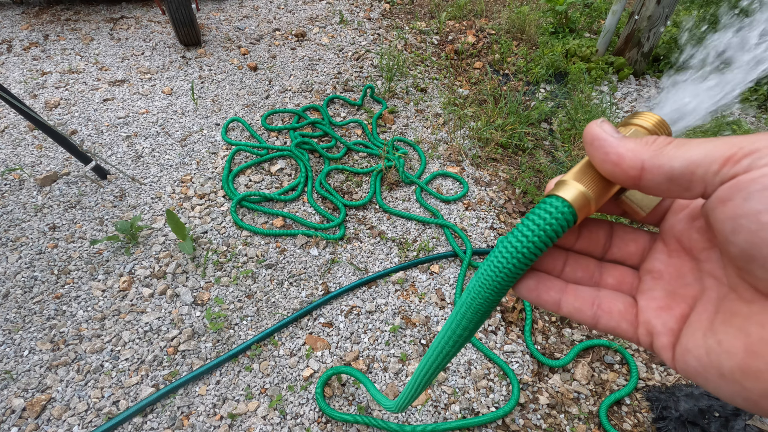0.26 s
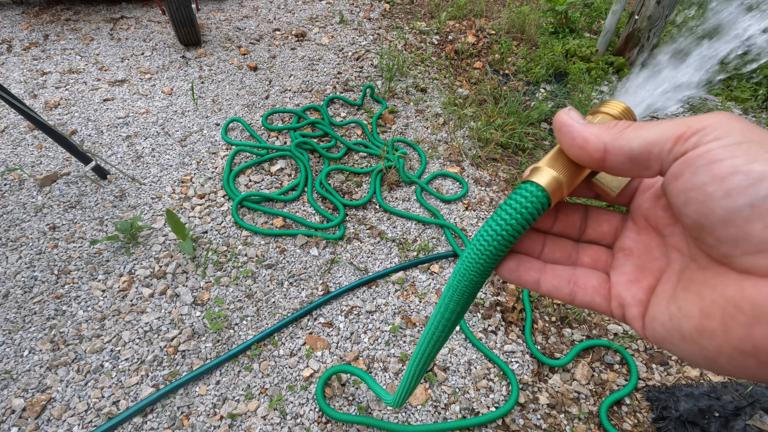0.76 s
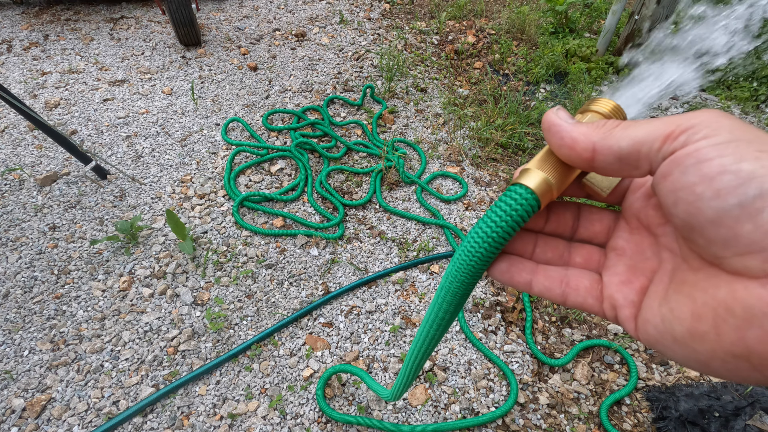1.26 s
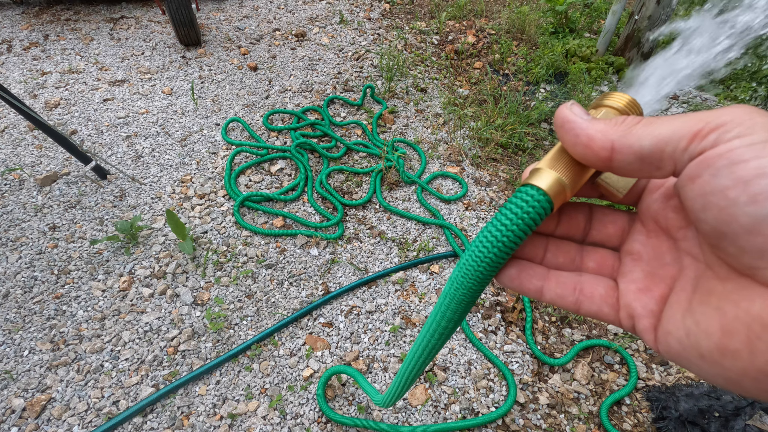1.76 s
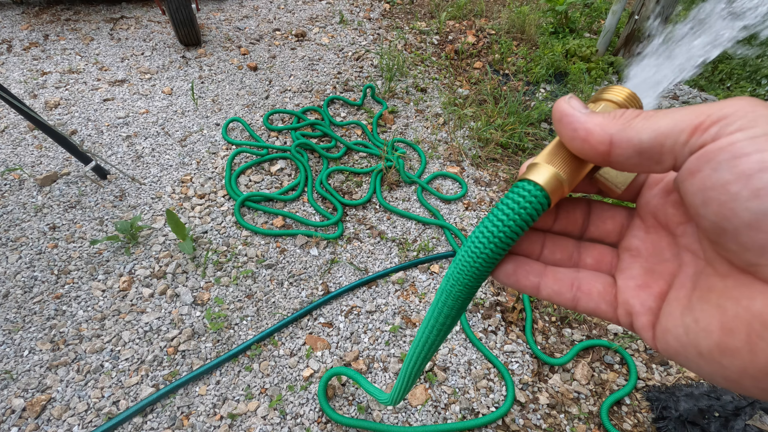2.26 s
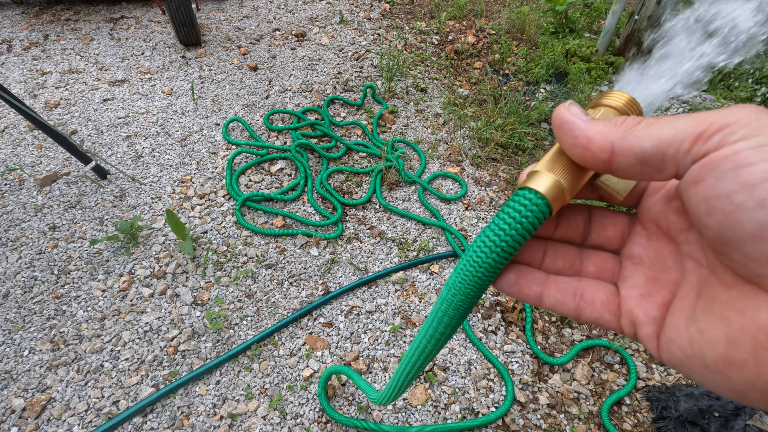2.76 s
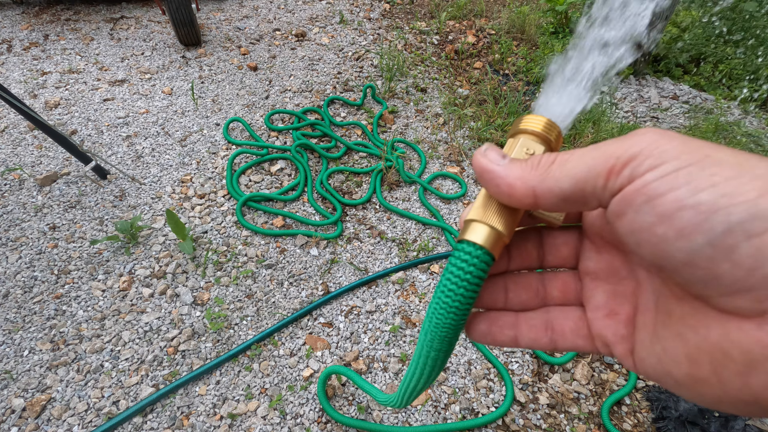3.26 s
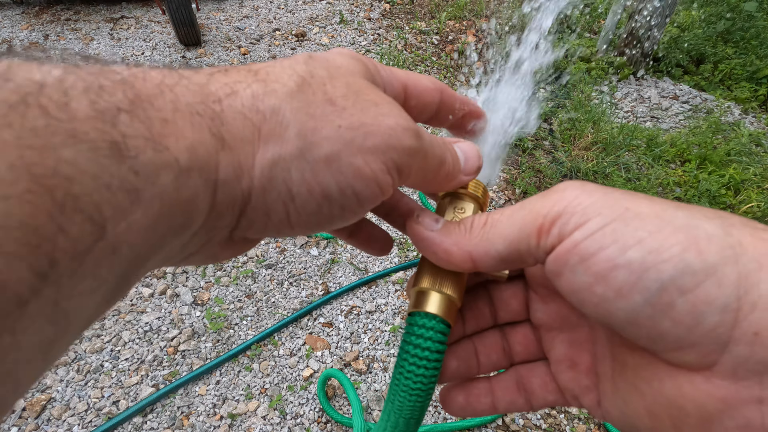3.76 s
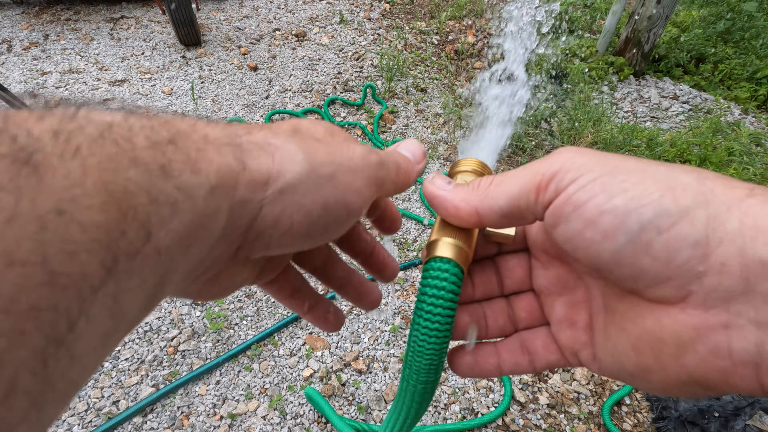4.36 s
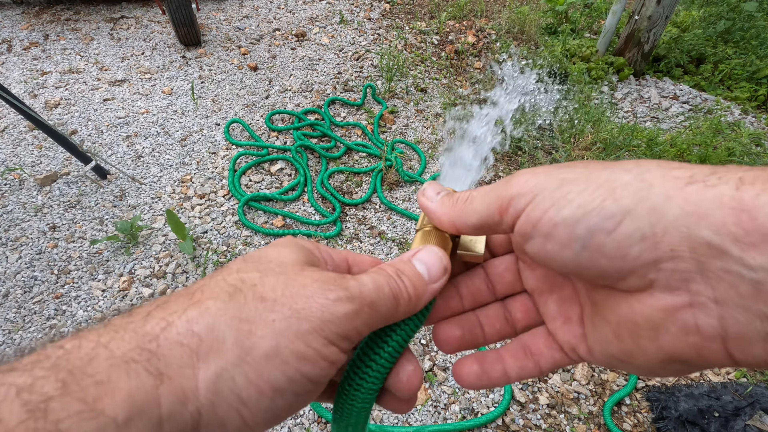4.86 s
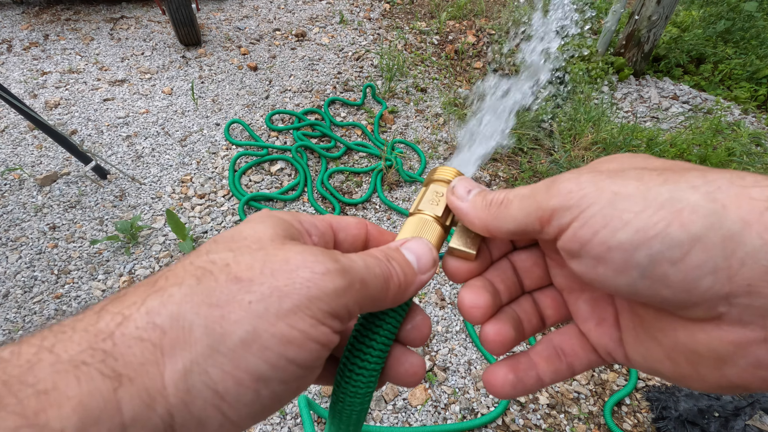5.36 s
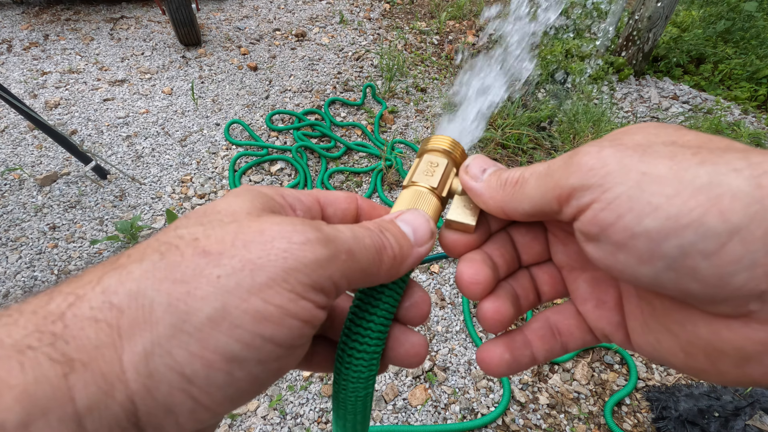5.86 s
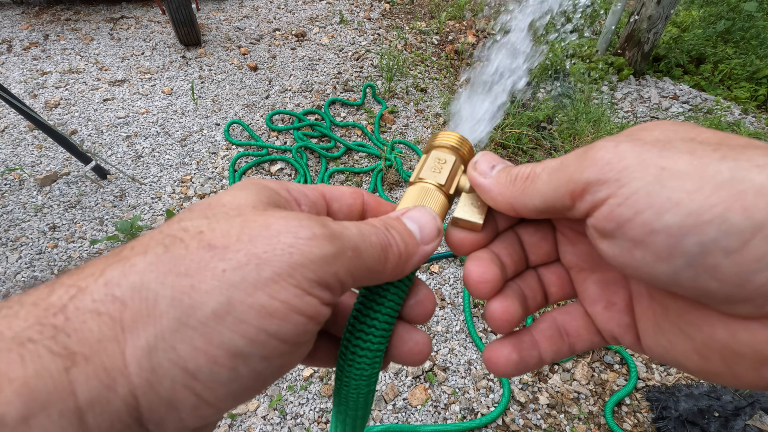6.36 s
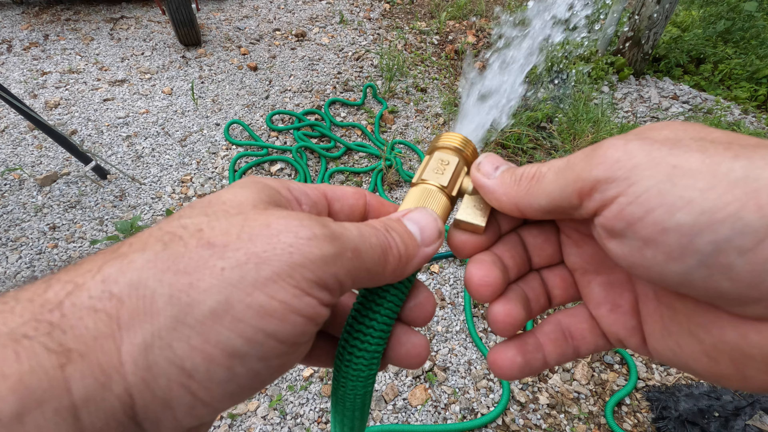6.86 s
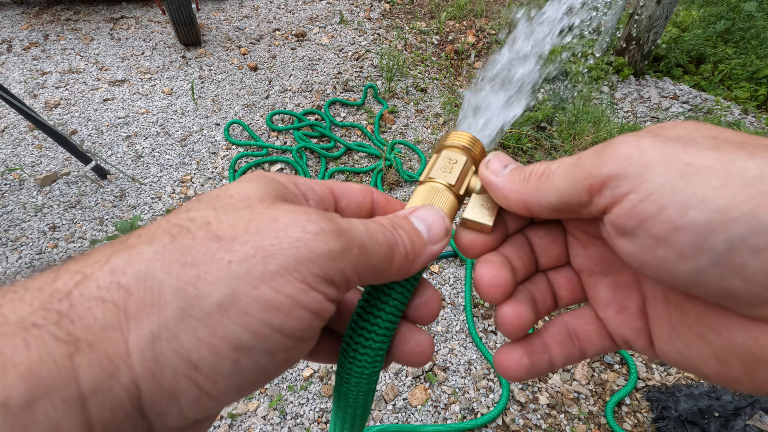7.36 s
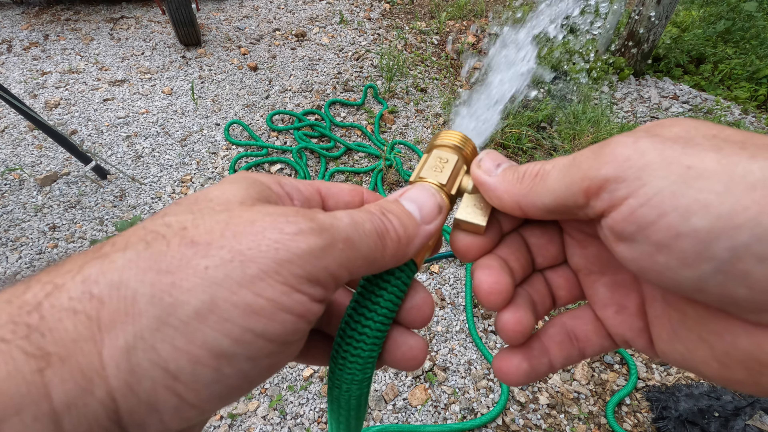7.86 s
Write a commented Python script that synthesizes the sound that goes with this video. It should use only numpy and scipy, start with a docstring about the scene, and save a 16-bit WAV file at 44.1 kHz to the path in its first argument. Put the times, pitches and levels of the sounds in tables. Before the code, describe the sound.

A garden hose gushes with a crackling, spitting hiss outdoors, swelling briefly into finer spray midway, with faint splatter on stones.

```python
"""Hose valve spraying onto gravel.

Water tears out of a close brass valve: a dense crackling hiss, with single spits as air pockets burst.
A hand turns the mouth towards the listener, trading its narrow ring for a broad hump higher up.
A fingertip dips into the jet and fans it into spray. The water splatters on gravel further off.
A low outdoor rumble and a faint mains hum lie underneath."""
import sys
import numpy as np
from scipy import signal
from scipy.fft import rfft, irfft, next_fast_len
from scipy.io import wavfile
from scipy.ndimage import uniform_filter1d, map_coordinates

SR = 44100
rng = np.random.default_rng(int(sys.argv[2]) if len(sys.argv) > 2 else 0)


def digitize_waveform(pressure):
    """Quantize a signal to 16-bit integers and store it at the path in sys.argv[1].

    Rows of a 2-D input are taken as channels; values are limited to [-1, 1].
    """
    field = np.atleast_2d(pressure).T
    bounded = np.clip(field, -1, 1)
    quanta = np.round(bounded * 32767).astype(np.int16)
    wavfile.write(sys.argv[1], SR, quanta)


N = 358533


def amp(db):
    """Gain of a level in dB."""
    return 10 ** (np.asarray(db) / 20)


def unit(x):
    """x at rms 1."""
    return x / np.sqrt(np.mean(x ** 2) + 1e-20)


def along(rows, hz, column=1):
    """One column of (Hz, value, ..) rows, read on a log axis."""
    columns = np.transpose(rows)
    return np.interp(np.log(hz + 1), np.log(columns[0] + 1), columns[column])


def curve(rows):
    """(seconds, value) rows as one value per sample."""
    return np.interp(np.arange(N) / SR, *np.transpose(rows))


def wobble(rate_hz):
    """Smooth random curve, rate_hz knots a second."""
    knots = rng.standard_normal(int(N * rate_hz / SR) + 4)
    return map_coordinates(knots, [np.arange(N) * rate_hz / SR])


def filtered(x, response):
    """x through a response given as a function of Hz."""
    size = next_fast_len(N + 8192)
    return irfft(rfft(x, size) * response(np.fft.rfftfreq(size, 1 / SR)), size)[..., :N]


def bursts(events, rise_s, fall_s):
    """Envelope of short (seconds, dB) events."""
    t = np.arange(-400, 2000) / SR
    shape = np.where(t < 0, np.exp(t / rise_s), np.exp(-t / fall_s))
    start_s, db = np.transpose(events)
    peaks = np.bincount(np.round((start_s + rise_s) * SR).astype(int), amp(db), N)[:N]
    return signal.fftconvolve(peaks, shape)[400:N + 400]


def patches(pair, depth_db, size, bins, frames):
    """Random gain in spectrogram patches of bins x frames."""
    cells = signal.stft(pair, nperseg=size)[2]
    field = uniform_filter1d(rng.standard_normal(cells.shape[1:]), bins, axis=0)
    field = uniform_filter1d(field, frames, axis=1)
    return signal.istft(cells * amp(depth_db * unit(field)), nperseg=size)[1][:, :N]


# Stereo likeness. Each row: frequency in Hz, left-right correlation.
CORRELATION = [(30, 0.71), (100, 0.78), (200, 1), (500, 0.83), (1000, 0.97), (6000, 0.89), (11000, 0.81),
               (11900, 0.18), (12700, 0.64), (15000, .5)]
FLAT = [(1000, 0)]


def heard(pair, spectrum, ports):
    """Colours a signal pair and mixes it to left and right as two microphone ports hear it, rms 1."""
    def colour(hz):
        angle = np.arccos(np.clip(along(CORRELATION, hz), -1, 1)) / 2
        return amp(along(spectrum, hz)) * [np.cos(angle), np.sin(angle)]

    def port_offset(hz):
        half = np.array([[.5], [-.5]])
        return amp(half * along(ports, hz, column=2)) * np.exp(-1j * half * along(ports, hz))

    mid, side = filtered(pair, colour)
    return unit(filtered(np.array([mid + side, mid - side]), port_offset))


def droplets(count, cycles, spread_db, linger):
    """Tiny bubbles: damped sines at scattered pitches, mostly faint and short, a few strong or long."""
    start, pitch, chance, luck = rng.random((count, 4)).T[:, :, None]
    hz = 700 * 2 ** (4.444 * pitch)
    strength = amp(-spread_db * np.log(chance + .018))
    life_cycles = cycles * (1 + linger * luck ** 4)
    gain = strength * np.sqrt(cycles / life_cycles) * hz  # times hz: even energy per Hz
    t = np.arange(160) / SR
    pops = gain * np.sin(2 * np.pi * hz * t) * np.exp(-t * hz / life_cycles)
    at = (start * N).astype(int) + np.arange(160)
    return unit(np.bincount(at.ravel(), pops.ravel(), N + 160)[:N])


def turbulence(patchy_db, grainy_db, flutter_db, crackle_db, drops_db):
    """Breaking water: two patchy white noises swelling together, with droplets in the first."""
    pair = patches(rng.standard_normal((2, N)), patchy_db, size=256, bins=5, frames=3)
    pair = patches(pair, grainy_db, size=64, bins=3, frames=2)
    pair = unit(pair * amp(crackle_db * wobble(700)))
    pair[0] += amp(drops_db) * droplets(count=12000, cycles=1.3, spread_db=3.5, linger=4.6)
    return pair * amp(flutter_db * wobble(40))


# Jet spectra from the side and the front. Each row: frequency in Hz, relative density in dB.
ASIDE_SPECTRUM = [(710, -47), (1200, -14), (1410, -16.5), (2050, -8.5), (2330, -12), (2620, -6), (2920, -8),
                  (3500, -5.5), (3740, -2.5), (4090, -2.5), (4340, -5), (4750, -5.5), (5300, -8.5),
                  (5990, -8), (6810, -13.5), (8520, -13.5), (10000, -22.5), (12300, -24.5), (15500, -48)]
FACING_SPECTRUM = [(710, -26), (1200, -16), (1650, -13), (2010, -15), (2680, -11), (2950, -6.5),
                   (3320, -10.5), (3750, -5.5), (4340, -1.5), (4750, 0), (4950, -1.5), (5200, -1.5),
                   (5450, -6), (5700, -9), (6300, -10.5), (7300, -9), (7900, -9.5), (8350, -14),
                   (9490, -13.5), (10000, -17.5), (10700, -18), (11600, -23.5), (11900, -28), (12400, -25),
                   (13700, -30), (14500, -34), (15500, -46)]
# Jet at the ports. Each row: frequency in Hz, right lead in radians, left over right in dB.
ASIDE_PORTS = [(300, 0, -1.5), (1300, 0.57, -4), (3000, 0.75, -4.5), (4520, 0.54, -3.5), (5900, 0.55, -4.5),
               (8700, -0.76, -5.5), (10500, -0.0026, -.7), (11500, -.2, 0), (12100, -0.92, 3),
               (13000, -.1, -1)]
FACING_PORTS = [(300, -0.32, 1), (1300, 0.52, -3.5), (3000, 0.56, -3), (4700, 0.48, -1), (6500, 0.54, -1.5),
                (8700, 0.68, -3.5), (10500, -0.13, 0), (11700, .2, 0), (12200, -1.6, 2),
                (13000, -0.8, -0.5)]
# Aim of the mouth. Each row: time in seconds, turn from 0 (aside) to 1 (facing).
MOUTH_TURN = [(0, 0.12), (1.3, 0.028), (2.5, 0.08), (3.1, 0.12), (3.7, 0.42), (4.55, 0.57), (4.8, 0.67),
              (5.2, 0.84), (6, 0.94), (8.13, 0.91)]


def aimed(pair, aside=ASIDE_SPECTRUM, facing=FACING_SPECTRUM):
    """The turning mouth crossfades its side sound into its front sound."""
    turn = curve(MOUTH_TURN)
    return (1 - turn) * heard(pair, aside, ASIDE_PORTS) + turn * heard(pair, facing, FACING_PORTS)


# Jet strength. Each row: time in seconds, level in dB before aim and hand.
JET_LEVEL = [(0, -25.5), (2.5, -24.5), (3.0, -24.5), (3.39, -23.5), (3.425, -23.5), (3.46, -23),
             (3.64, -28.5), (3.68, -25), (3.73, -27.5), (3.85, -28.5), (4.4, -26), (4.55, -23.5),
             (4.95, -23.5), (5.15, -23.5), (6, -23), (6.3, -23.5), (6.44, -23), (6.5, -21.5), (6.56, -24.5),
             (6.6, -22.5), (6.68, -21), (6.72, -24.5), (6.85, -24.5), (6.93, -22.5), (7, -23.5),
             (7.18, -25), (7.33, -23.5), (7.4, -22), (7.47, -23.5), (7.6, -23), (7.7, -23), (7.78, -23.5),
             (7.9, -24), (8.13, -24)]


def jet():
    """The jet breaks up into a crackling hiss."""
    water = turbulence(patchy_db=0.67, grainy_db=1.84, flutter_db=0.35, crackle_db=1.4, drops_db=-6.5)
    return amp(curve(JET_LEVEL)) * aimed(water)


def mouth_ring(low_hz=3705, width_hz=170, wander_hz=90, aside_db=-33, facing_change_db=-22):
    """The flow rings the valve mouth in a narrow, wandering band that fades as it turns to the front."""
    def resonance(hz, centre_hz):
        damping = 1j * hz * width_hz
        return np.abs(damping / (centre_hz ** 2 - hz ** 2 + damping)) ** 2

    calm = turbulence(patchy_db=0, grainy_db=-2.5, flutter_db=1, crackle_db=-0.5, drops_db=-15)
    flow = heard(calm, FLAT, ASIDE_PORTS)
    low = filtered(flow, lambda hz: resonance(hz, low_hz))
    high = filtered(flow, lambda hz: resonance(hz, low_hz + wander_hz))
    high_share = 1 / (1 + np.exp(1 - 2 * wobble(4)))
    level_db = aside_db + facing_change_db * curve(MOUTH_TURN) + 1.3 * wobble(12)
    return amp(level_db) * unit((1 - high_share) * low + high_share * high)


# Loudest air pockets. Each row: start in seconds, relative level in dB, pitch in Hz.
AIR_POCKETS = [(0.1045, -10, 3760), (0.2633, -9, 4000), (0.2682, -10, 3510), (0.3255, -13, 3900),
               (0.3606, -9, 4050), (0.3895, -9, 5700), (0.609, -7, 3760), (0.991, -9, 3740),
               (1.0932, -8, 3730), (1.1457, -9, 3690), (1.701, -11, 4070), (1.725, -8.5, 3780),
               (1.9622, -10, 4130), (2.0928, -13, 4020), (2.1375, -17, 3770), (2.6893, -7, 3680),
               (2.932, -11, 3890), (3.289, -12, 5500), (3.3647, -10, 5030), (3.427, -8, 5000),
               (3.9703, -13, 3720), (4.0027, -5.5, 2990), (4.0412, -6, 3930), (4.1017, -5.5, 2970),
               (4.563, -7, 4360), (4.711, -5, 4270), (4.876, -13, 4460), (4.9935, -7, 4960),
               (5.0469, -3.5, 5000), (5.0806, -8, 4490), (5.1218, -13, 4620), (5.1452, -12, 4700),
               (5.1685, -9, 4660), (5.173, -9, 4303), (5.1835, -13, 7960), (5.3604, -7.5, 3970),
               (5.437, -7, 4500), (5.642, -10, 4390), (5.975, -7, 4070), (6.001, -7, 4570),
               (6.059, -11, 4700), (6.1604, -17, 4130), (6.476, -10, 4950), (6.7341, -11, 4700),
               (7.1212, -13, 4460), (7.3203, -11, 4900), (7.3931, -5, 4520), (7.5522, -9, 4290),
               (7.5793, -12, 5080), (7.754, -5, 4650), (7.7992, -7, 4580), (7.8092, -7, 4960),
               (7.94, -11, 4720), (7.9823, -11, 4740), (8.0031, -10, 4470), (8.015, -4.5, 5050),
               (8.0579, -8.5, 4600)]


def spits(small_count=18, hiss_db=-9.5, tone_db=-6, lag_s=0.00058, rise_s=0.0007, fall_s=0.001):
    """Air pockets burst at the mouth: loud ones hiss and ring, small random ones only hiss."""
    when, chance = rng.random((small_count, 2)).T
    small_db = -20.5 + 2 * (2 * chance - 1)
    small = bursts(np.transpose([when * N / SR, small_db]), rise_s, fall_s)
    start_s, loud_db, pitch_hz = np.transpose(AIR_POCKETS)
    loud = bursts(np.transpose([start_s + lag_s, loud_db]), rise_s, fall_s)
    nearest = np.searchsorted((start_s[1:] + start_s[:-1]) / 2, np.arange(N) / SR)
    phase = 2 * np.pi * (np.cumsum(pitch_hz[nearest]) / SR + rng.random())
    tone = amp(tone_db) * loud * np.sin(phase)
    hiss = (amp(hiss_db) * loud + small) * np.sign(rng.standard_normal((2, N)))
    return np.std(hiss) * aimed(hiss) + np.std(tone) * aimed(np.array([tone, 0 * tone]), FLAT, FLAT)


# Spray strength. Each row: time in seconds, level in dB before the hand.
SPRAY_LEVEL = [(3.3, -42), (3.55, -27), (3.75, -22), (3.84, -24), (3.9, -20.5), (3.97, -22), (4.0, -20),
               (4.025, -22.5), (4.05, -18), (4.08, -21), (4.13, -20), (4.18, -20), (4.24, -20),
               (4.31, -19.5), (4.37, -26), (4.42, -24), (4.5, -26.5), (4.62, -37), (4.8, -60)]
# Spray colour. Each row: frequency in Hz, relative density in dB.
SPRAY_SPECTRUM = [(350, -49), (600, -36), (716, -38), (1010, -15), (1230, -12.5), (1430, -7.5), (3070, 0.5),
                  (4380, -2), (5590, -8.5), (7350, -2.5), (8300, -8), (10800, -13), (13700, -24),
                  (15500, -41)]
# Spray at the ports. Each row: frequency in Hz, right lead in radians, left over right in dB.
SPRAY_PORTS = [(300, 0.1, 4), (2800, 0.53, -3), (4300, 0.74, .7), (5000, 1, 2), (6000, 0.21, -0.5),
               (9500, 0.47, 0), (11600, 0.41, 0), (12400, -1.3, 4.5), (13200, -.4, 0)]


def finger_spray():
    """The fingertip fans part of the jet into a finer, louder spray."""
    water = turbulence(patchy_db=1, grainy_db=1.5, flutter_db=0.5, crackle_db=1.7, drops_db=-3.5)
    return amp(curve(SPRAY_LEVEL)) * heard(water, SPRAY_SPECTRUM, SPRAY_PORTS)


# Bands the hand lifts or shades. Each row: start and end in seconds, first and last centre in Hz,
# width in Hz, gain in dB.
HAND_BANDS = [(3.2, 3.55, 5700, 5400, 450, 3.5), (3.46, 3.8, 4600, 4800, 350, 5),
              (3.25, 3.48, 4600, 4100, 250, -1.5), (3.86, 4.08, 3600, 3100, 400, 1.5),
              (3.1, 3.75, 6800, 5000, 420, -2), (3.7, 4.15, 4600, 5700, 300, -5.5),
              (3.2, 4.5, 9100, 8900, 520, -2.5), (3.95, 4.37, 11000, 9300, 1000, 2),
              (4.3, 4.52, 5700, 3100, 480, -4.5), (4.42, 4.74, 3550, 3000, 240, -8),
              (4.45, 4.78, 3800, 3680, 150, 4.5), (4.33, 4.5, 7700, 8400, 2900, -3),
              (4.41, 5.16, 6100, 9700, 2000, -3), (4.75, 5.3, 3900, 3300, 530, 1.5),
              (5.1, 6.7, 3950, 4100, 300, 1.5)]


def hand(valve, fade_share=0.26):
    """Reflection and shadow of the hand near the mouth: bell-shaped gains that come, glide and go."""
    hz, t, cells = signal.stft(valve, SR, nperseg=512)
    db = 0
    for start_s, end_s, from_hz, to_hz, width_hz, gain_db in HAND_BANDS:
        progress = (t - start_s) / (end_s - start_s)
        fade = np.clip(np.minimum(progress, 1 - progress) / fade_share, 0, 1)
        centre_hz = from_hz + progress * (to_hz - from_hz)
        db = db + gain_db * fade * np.exp(-.5 * ((hz[:, None] - centre_hz) / width_hz) ** 2)
    return signal.istft(cells * amp(db), SR, nperseg=512)[1][:, :N]


# Splatter on the gravel. Each row: time in seconds, level in dB.
GRAVEL_LEVEL = [(0, -39.5), (.8, -40.5), (1.3, -44.5), (1.7, -40.5), (3.5, -39.5), (3.65, -37), (4.3, -37),
                (4.75, -42), (5, -38), (6.27, -39), (6.36, -34.5), (6.68, -35), (6.74, -37.5),
                (8.13, -38.5)]
# Splatter colour. Each row: frequency in Hz, relative density in dB.
GRAVEL_SPECTRUM = [(250, -12), (450, -10.5), (750, -7.5), (950, -0.5), (1300, -4.5), (2000, -10),
                   (4000, -32), (9000, -46)]
# Big slugs of water. Each row: start in seconds, peak in dB.
BIG_SLUGS = [(5.509, -21), (6.6765, -16.5)]
# Far sources at the ports. Each row: frequency in Hz, right lead in radians, left over right in dB.
FAR_PORTS = [(30, 0, -0.5), (300, 0, -1.5), (1000, 0.27, -2.1), (3000, .5, 0)]


def gravel_splatter():
    """Water splatters on stones a few metres away; each big slug gives a single slap."""
    water = turbulence(patchy_db=1.9, grainy_db=2.3, flutter_db=1.15, crackle_db=1.6, drops_db=-16.5)
    splatter = amp(curve(GRAVEL_LEVEL)) * heard(water, GRAVEL_SPECTRUM, FAR_PORTS)
    push = bursts(BIG_SLUGS, rise_s=0.0001, fall_s=0.00015)
    slaps = heard(np.array([push, 0 * push]), GRAVEL_SPECTRUM, FAR_PORTS)
    return splatter + slaps * push.max() / np.abs(slaps).max()


# Rumble strength. Each row: time in seconds, level in dB.
RUMBLE_LEVEL = [(0, -44.5), (3.3, -45.5), (3.65, -42.5), (5, -45), (6.4, -43), (8.13, -44)]
# Rumble colour. Each row: frequency in Hz, relative density in dB.
RUMBLE_SPECTRUM = [(12, -36), (20, -13), (65, -12.5), (92, -15), (107, -21), (182, 0), (278, -6), (307, -8),
                   (543, -22.5), (600, -11.5), (780, -16.5), (1320, -120)]


def outdoor_rumble():
    """Lumpy low noise from far off."""
    level_db = curve(RUMBLE_LEVEL) + 0.47 * wobble(1.76)
    lumps = patches(rng.standard_normal((2, N)), depth_db=1.2, size=2048, bins=4, frames=2)
    return amp(level_db) * heard(lumps, RUMBLE_SPECTRUM, FAR_PORTS)


# Mains tones. Each row: frequency in Hz, rms level in dB.
HUM_TONES = [(59, -67), (120, -59.5)]


def mains_hum():
    """Faint sines, slightly unsteady in level and phase."""
    t = np.arange(N) / SR
    hum = np.zeros(N)
    for hz, db in HUM_TONES:
        peak = np.sqrt(2) * amp(db + 0.83 * wobble(3.6))
        hum += peak * np.sin(2 * np.pi * hz * t + 0.47 * wobble(2.14))
    return hum


def scene():
    """Sums the sources; the hand colours only what comes from the valve."""
    valve = jet() + mouth_ring() + spits() + finger_spray()
    return hand(valve) + gravel_splatter() + mains_hum() + outdoor_rumble()


def record(dry, top_hz=15700):
    """Brick-wall low-pass."""
    return filtered(dry, lambda hz: hz < top_hz)


dry = scene()
out = record(dry)
digitize_waveform(out)
```